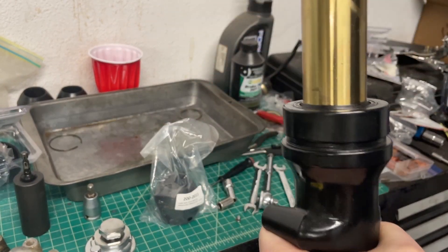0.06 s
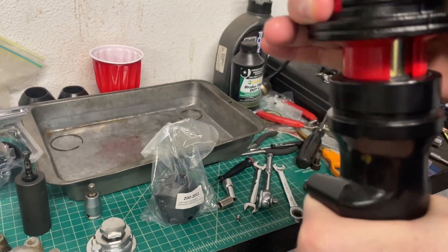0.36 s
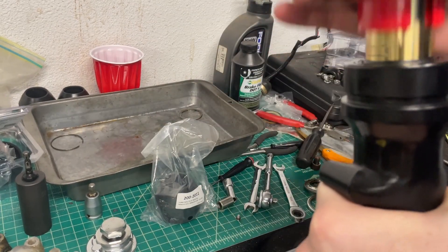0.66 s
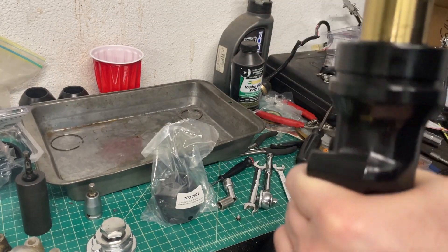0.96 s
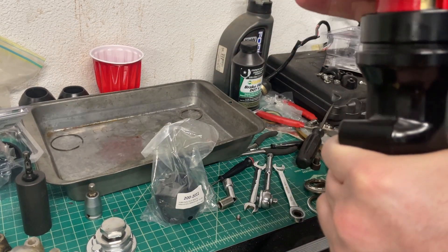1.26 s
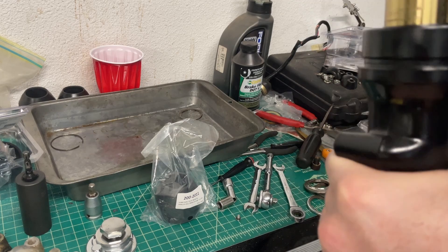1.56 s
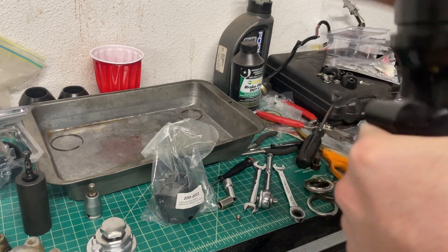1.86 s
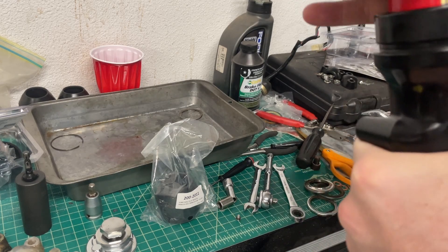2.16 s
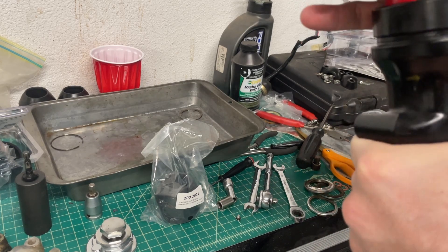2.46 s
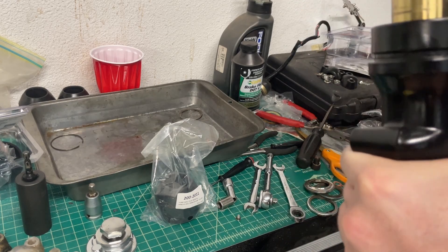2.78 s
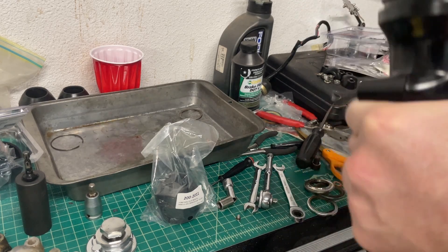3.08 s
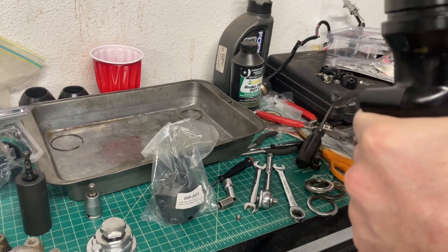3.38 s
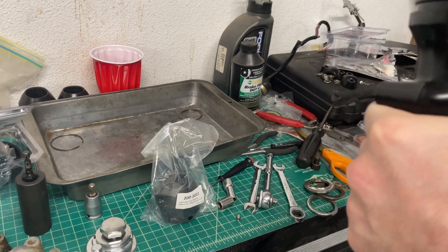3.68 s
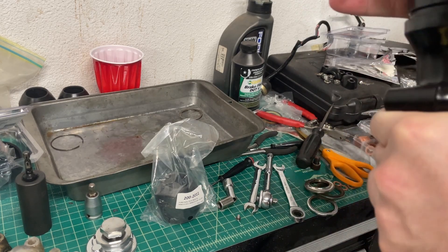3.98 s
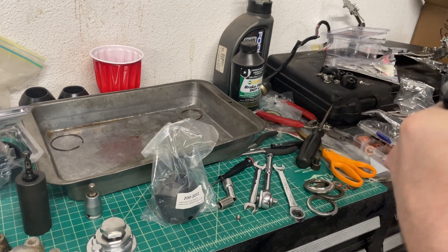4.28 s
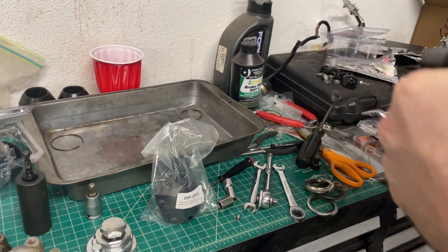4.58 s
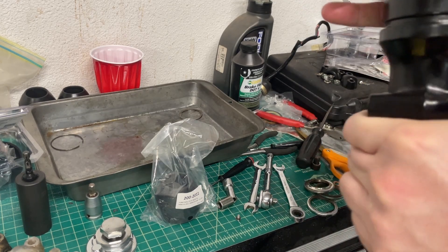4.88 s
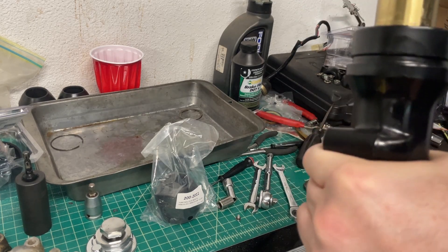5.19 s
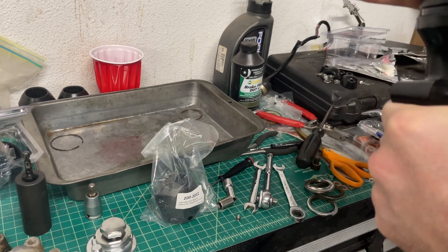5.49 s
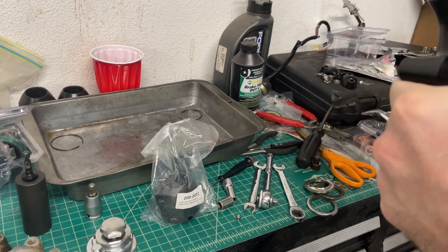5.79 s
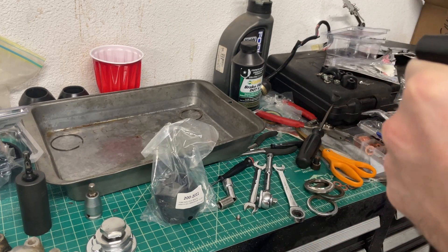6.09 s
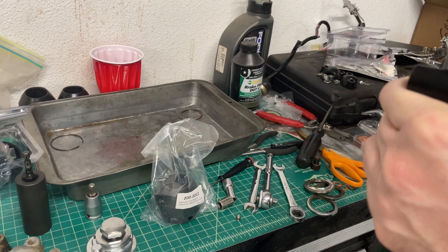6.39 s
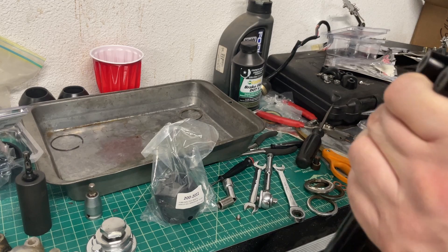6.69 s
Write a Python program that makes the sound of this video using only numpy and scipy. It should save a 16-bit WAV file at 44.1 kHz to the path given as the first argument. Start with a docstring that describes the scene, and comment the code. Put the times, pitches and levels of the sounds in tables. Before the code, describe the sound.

A steel driver is slammed down a hand-held fork tube in a quiet garage, close to the microphone. After a faint rub and a light tap, the first blow lands at 0.3 seconds, a quick scrape running into a loud, sharp metallic clack with a dull thud and a short ring. Two more follow at about 1.1 and 1.8 seconds. After a slightly longer gap, four come evenly at about 3.0, 3.8, 4.6 and 5.4 seconds. Each leaves a brief room echo, and most are followed at once by a smaller click as the driver bounces, clearest after the third. Between blows the driver is lifted with a faint sliding hiss, light ticks, tiny squeaks and an occasional soft knock. After the last blow it slides very faintly, with a couple of tiny ticks just after 6 seconds, fading into low room noise.

```python
"""Driving a fork seal

A steel driver is slammed down a fork tube seven times, close to the microphone in a garage.
Each stroke: it is lifted, hissing and tapping, scrapes down the tube, clacks twice on the seal
and thuds through the hand-held fork leg. A limiter ducks on the blows and lets the room swell back."""
import sys
import numpy as np
from scipy import signal
from scipy.fft import rfft, irfft, next_fast_len
from scipy.io import wavfile
from scipy.ndimage import uniform_filter1d

SR = 44100
rng = np.random.default_rng(int(sys.argv[2]) if len(sys.argv) > 2 else 0)


def persist_wave(psi):
    """Save psi, clipped to +-1, as 16-bit WAV."""
    counts = np.round(np.clip(psi, -1, 1) * 32767).astype(np.int16)
    wavfile.write(sys.argv[1], SR, np.atleast_2d(counts).T)


N = 297498
T = np.arange(SR) / SR  # 1 s time axis
LIFT_S, FALL_S = .33, .122

# Event levels are relative; the functions add layer gains.
# strokes (time [s], first clack [dB], contact gap [s], second clack [dB], treble [dB],
#          scrape [dB], thud [dB], thud pitch [Hz], sway [dB], sliding [dB])
STROKES = [(0.2842, 6, .0062, -2, -7, 17.5, 5, 175.8, -44, -45),
           (1.053, 11.5, 0.0075, 3.5, -2.5, -0.5, 13.5, 202, -28.5, -56),
           (1.8274, 4.5, 0.0046, 11.5, -4, -9.5, 5, 230.4, -44, -60.5),
           (3.0499, 7, .003, 8.5, 1.5, -7.5, 8, 333.8, -32.5, -62),
           (3.783, 5, .0052, 6, 4, -9.5, 9, 191.6, -33.5, -71),
           (4.576, 7, .004, 5, 0.5, -7.5, 6, 318.6, -42, -71),
           (5.3816, -0.5, .0062, 11.5, 5.5, -1.5, 13.5, 264.8, -53, -65.5)]
# driver drops back on the seal (time [s], level [dB])
SEAL_BOUNCES = [(0.3378, -14), (1.8798, -1), (3.0960, -15.5), (3.832, -15), (4.6280, -6.5)]
# loose driver taps the tube (time [s], level [dB], treble [dB])
TUBE_TAPS = [(0.2, -41, -9), (0.2221, -26.5, -3.5), (0.8755, -44, -12), (1.5609, -52, -3.5),
             (1.6793, -45.5, 2), (1.795, -47.5, -3), (2.162, -42.5, 2), (2.7273, -50.5, -4),
             (2.7563, -52, -4.5), (3.583, -59, 1.5), (3.7385, -51.5, 2), (4.2854, -43, -14.5),
             (4.52, -48, -3), (4.5428, -47.5, -5), (5.0337, -44, -15.5), (6.1191, -64, 1.5),
             (6.3194, -65.5, -7)]
# leg knocks in the hand (time [s], level [dB], pitch [Hz])
LEG_KNOCKS = [(0.222, -36, 125.7), (1.248, -36.5, 124.6), (3.221, -48.5, 201), (3.945, -49.5, 129)]
# driver catches on the tube (time [s], level [dB], pitch [Hz], length [s])
TUBE_SQUEAKS = [(0.062, -47, 2096, 0.096), (0.702, -59.5, 2090, 0.11), (0.772, -60, 2040, 0.059),
                (1.596, -51.5, 2070, 0.061), (2.795, -62, 2350, 0.082), (3.604, -59, 2390, 0.047),
                (6.13, -67.5, 2307, .1)]
# driver eased along after the last blow (start [s], length [s], level [dB])
EASE_MOVES = [(5.548, 0.36, -66.5), (6.089, 0.23, -67)]
# hand shifting on the leg (time [s], level [dB])
GRIP_ENVELOPE = [(0, -53), (0.219, -53.5), (0.298, -57.5), (.6, -98)]
# faint hiss and rub between the blows, fading at the end (time [s], level [dB])
BACKGROUND_HISS_ENVELOPE = [(0, -60.5), (.15, -52), (0.599, -70), (2.5, -76), (3.299, -70), (4.2, -74),
                            (5.2, -66), (6.0, -81), (6.75, -99)]
# steel resonances (frequency [Hz], base width [Hz], level [dB])
DRIVER_MODES = [(1830, 40, -3), (2200, 110, 0), (2370, 22, -4), (2700, 50, -1), (2900, 48, -2),
                (3110, 54, -4), (3700, 100, -4), (3880, 73, -1), (4160, 120, -3), (4570, 130, -5),
                (5750, 170, -6), (6160, 53, -5), (6460, 39, -8), (7880, 110, -14), (8130, 60, -14),
                (9850, 110, -9), (10600, 100, -8), (11300, 55, -5), (12100, 75, -5), (12900, 250, -2),
                (13300, 54, -8), (13800, 62, -9)]
TUBE_MODES = [(1150, 53, -17), (1860, 120, -4), (2240, 110, -4), (2640, 58, -5), (2840, 60, -5),
              (3140, 140, -5), (3420, 84, -7), (3770, 95, -1), (4360, 88, -10), (4990, 91, -6),
              (5380, 110, -14), (5730, 110, -8), (6610, 130, 0)]
# noise spectra (frequency [Hz], density [dB])
CRACK_SPECTRUM = [(400, -27.5), (800, -9.5), (1300, -9), (1900, 0.5), (3000, -0.5), (4500, -6.5),
                  (6300, -1.5), (8000, -0.5), (10000, -2.5), (12500, -3.5), (14000, -13.5), (16000, -29)]
SCRAPE_SPECTRUM = [(300, -14.5), (700, -11), (1200, -20), (1800, -1), (2500, -12.5), (4000, -14),
                   (6500, -20.5), (8000, -27), (14000, -35.5)]
RUB_SPECTRUM = [(200, -10), (400, -7), (700, -25.5), (1050, 1.5), (1350, -11.5), (2000, 5.5), (2800, -11.5),
                (3900, 3), (5500, -14), (8000, -12), (14000, -33)]
HISS_SPECTRUM = [(3000, -21.5), (6500, -7.5), (8400, -23.5), (9800, -5), (11000, -10.5), (12400, 2),
                 (14000, -10.5), (16000, -6.5)]
TAP_SPECTRUM = [(300, -20.5), (650, -34), (1080, -7.5), (1400, -22.5), (1950, 5), (2200, -1), (2500, -13.5),
                (3700, -5), (5300, -19.5), (6500, -12.5), (9000, -25.5), (14000, -32)]
GRIP_SPECTRUM = [(25, -18.5), (70, 2.5), (110, 1), (200, -16.5), (400, -24.5), (900, -52.5)]
ECHO_SPECTRUM = [(80, -21.5), (250, -14.5), (500, -14.5), (1000, -17.5), (1450, -15), (1900, -5),
                 (2400, -3.5), (4600, -6.5), (6000, -7.5), (8500, -20.5), (10600, -8), (12600, -10.5),
                 (15000, -29.5)]
RUMBLE_SPECTRUM = [(25, -24), (45, -14.5), (64, -2.5), (90, -11.5), (120, -12), (160, -22), (250, -27.5),
                   (450, -28.5), (650, -39.5), (2000, -41.5), (6000, -41), (15000, -45)]
# garage decay (frequency [Hz], T60 [s])
ECHO_DECAY = [(200, 0.37), (800, 0.51), (2200, 0.55), (4500, 0.47), (7000, 0.49), (12000, 0.28)]
# phase between microphone ports (frequency [Hz], left lead [rad])
MIC_PHASE = [(150, 0.12), (450, 1.04), (1200, 1.4), (2100, 0.9), (2900, 1.39), (4700, 0.62), (5500, 1),
             (7500, 3.5), (9000, 3.5), (11000, 1.19), (13500, 0.5), (16000, 1)]
# balance between microphone ports (frequency [Hz], left minus right [dB])
MIC_BALANCE = [(100, 1.5), (250, -1), (500, 1), (1200, 2), (2400, 0), (8000, 1.5), (15000, -1.5)]


def strokes(scrape_pan_db=-9, thud_lag_s=.00062, echo_db=-19):
    """Scrape, then two contacts as the driver seats; their energy excites the room. Some strokes bounce."""
    near, shocks, scrapes = np.zeros(N), np.zeros(N), np.zeros((2, N))
    pan_db = np.array([[.5], [-.5]]) * scrape_pan_db
    for time_s, first_db, gap_s, second_db, treble_db, scrape_db, thud_db, thud_hz, sway_db, _ in STROKES:
        slide = scrape() * undb(scrape_db - 4 + pan_db)
        first = undb(first_db) * clack(treble_db, ring_db=-.5)
        second = undb(second_db) * clack(treble_db, ring_db=-2.5)
        add(scrapes, time_s - slide.shape[1] / SR, slide)
        add(near, time_s, first)
        add(near, time_s + gap_s, second)
        add(near, time_s + thud_lag_s, undb(thud_db - 7) * thud(thud_hz))
        add(near, time_s + thud_lag_s + .8 * gap_s, undb(thud_db - 1) * thud(thud_hz))
        add(near, time_s, undb(sway_db) * sway())
        strength = np.hypot(np.linalg.norm([first, second]), undb(-7) * np.linalg.norm(slide))
        add(shocks, time_s, strength * shock(treble_db))
    for time_s, level_db in SEAL_BOUNCES:
        add(near, time_s, undb(level_db) * clack(treble_db=-11.5, ring_db=-1.5))
    return mic_ports(near) + scrapes + undb(echo_db) * garage_echo(shocks)


def clack(treble_db, ring_db, crack_t60_s=.028, clatter_db=-28, clatter_t60_s=.16):
    """Steel on steel: a crack of dense modes, the driver's ring, a fine clatter off the bench."""
    envelope = decay(crack_t60_s) + undb(clatter_db) * decay(clatter_t60_s)
    crack = noise(CRACK_SPECTRUM, SR) * envelope
    steel = undb(ring_db) * ring(DRIVER_MODES, damping=.88)
    return shelf(crack + steel, 10000, treble_db)


def ring(modes, damping, scatter_db=7, detune=.003):
    """Decaying modes; each contact lands elsewhere and weights them anew."""
    hz, width_hz, level_db = np.transpose(modes)
    level_draw, pitch_draw, phase = rng.standard_normal((len(hz), 3)).T
    t = T[:SR // 8, None]
    tones = np.sin(2 * np.pi * (hz * (1 + detune * pitch_draw) * t + phase))
    waves = tones * np.exp(-np.pi * width_hz * damping * t)
    weight = undb(level_db + scatter_db * level_draw) * np.sqrt(width_hz)
    return np.pad(waves @ weight / np.linalg.norm(weight), (0, SR - len(t)))


def thud(pitch_hz, lag_cycles=.9):
    """Bending wave in the leg: lows arrive late, so the pitch falls."""
    hz = np.fft.rfftfreq(SR // 2, 1 / SR) + 1
    ratio = hz / pitch_hz
    knock = 1 / np.sqrt(1 + (.7 / ratio) ** 5)
    bass = 1 / (1 + (58 / hz) ** 4)
    rolloff = 1 / np.sqrt(1 + ratio ** 4.2) / (1 + (hz / 1100) ** 4)
    dispersion = np.exp(-2j * np.pi * lag_cycles * np.log(ratio))
    wave = irfft((knock + bass) * rolloff * dispersion)[:SR // 4]
    return wave / abs(wave).max()


def sway(low_hz=45, high_hz=48.1, t60_s=.75):
    """Leg and bench rock against each other: two deep modes beat."""
    return (np.sin(2 * np.pi * low_hz * T) - np.sin(2 * np.pi * high_hz * T)) * decay(t60_s)


def shock(treble_db, ring_db=-12):
    """What a blow sends into the room: an impulse plus a little driver ring."""
    steel = ring(DRIVER_MODES, damping=1.6, scatter_db=5)
    snap = (T == 0) + undb(ring_db) * steel / np.linalg.norm(steel)
    return shelf(snap / np.linalg.norm(snap), 11000, treble_db + 3)


def scrape(rise_s=.0038, grit_db=-9, run_up_db=-42, run_up_s=.02):
    """The accelerating driver sets the tube singing; ends at the blow."""
    size = SR // 4
    singing = tube_song(rng.standard_normal(size), damping=1.1)
    grit = undb(grit_db) * stereo_noise(SCRAPE_SPECTRUM, size, coherence=.11)
    speed = (np.exp(-T / rise_s) + undb(run_up_db) * np.exp(-T / run_up_s))[:size][::-1]
    return (singing + grit) * speed


def tube_song(force, damping):
    """Friction sustains the tube's modes; rms 1."""
    response = ring(TUBE_MODES, damping, scatter_db=4.5)[:SR // 8]
    song = signal.oaconvolve(force, response)[:len(force)]
    return song / song.std()


def sliding(slips_per_s=900, rub_db=-9):
    """Stick-slip on the oily tube: a ringing rub and a fine hiss. Both stay faintly between moves."""
    grip = wander(step_samples=600)
    slips = rng.standard_normal(N) * (rng.random(N) < slips_per_s / SR)
    ringing = undb(-3) * shelf(tube_song(slips, damping=1), 1200, -12)
    rub = undb(.5) * stereo_noise(RUB_SPECTRUM, N, coherence=.6, pan_db=-.5) + ringing
    envelope = hiss_envelope()
    hiss = stereo_noise(HISS_SPECTRUM, N, coherence=.46)
    return envelope * (undb(rub_db + 2.5 * grip) * rub + undb(2 * grip) * hiss)


def hiss_envelope(fall_db=6, uneven_db=1.2, uneven_per_s=20):
    """A faint background plus the driver's uneven speed: an arch per lift, then a ramp to the blow."""
    envelope = gain_curve(BACKGROUND_HISS_ENVELOPE)
    fall = undb(fall_db) * np.linspace(0, 1, int(FALL_S * SR))
    stroke = np.concatenate([arch(LIFT_S), fall])
    for time_s, *_, sliding_db in STROKES:
        add(envelope, time_s - LIFT_S - FALL_S, undb(sliding_db) * stroke)
    for start_s, length_s, level_db in EASE_MOVES:
        add(envelope, start_s, undb(level_db) * arch(length_s))
    return envelope * undb(uneven_db * wander(int(SR / uneven_per_s)))


def squeaks(skirt_hz=450):
    """Brief stick-slip bursts in one narrow resonance."""
    out = np.zeros(N)
    for time_s, level_db, hz, length_s in TUBE_SQUEAKS:
        size = int(length_s * SR)
        band = [(hz - skirt_hz, -35), (hz, 0), (hz + skirt_hz, -35)]
        add(out, time_s, undb(level_db) * np.hanning(size) * noise(band, size))
    return mic_ports(out)


def handling(tap_t60_s=.04, ring_db=-10, echo_db=-14):
    """The loose driver taps the tube; the leg rubs and knocks in the hand."""
    out = gain_curve(GRIP_ENVELOPE) * noise(GRIP_SPECTRUM, N)
    for time_s, level_db, treble_db in TUBE_TAPS + rattle():
        tap = noise(TAP_SPECTRUM, SR) * decay(tap_t60_s) + undb(ring_db) * ring(TUBE_MODES, damping=1)
        add(out, time_s, undb(level_db + 3) * shelf(tap, 6400, treble_db))
    for time_s, level_db, pitch_hz in LEG_KNOCKS:
        add(out, time_s, undb(level_db) * thud(pitch_hz))
    return mic_ports(out) + undb(echo_db) * garage_echo(out)


def rattle(taps_per_lift=2, spread_db=.5, treble_db=-3):
    """Faint random taps during each lift, as rows like TUBE_TAPS."""
    taps = []
    for time_s, *_, sliding_db in STROKES:
        for fraction, draw in zip(rng.random(taps_per_lift), rng.standard_normal(taps_per_lift)):
            tap_s = time_s - FALL_S - fraction * LIFT_S
            taps.append((tap_s, sliding_db - 4.5 + spread_db * draw, treble_db))
    return taps


def garage_echo(x, build_s=.0049):
    """Diffuse room echo; the top treble dies first."""
    diffuse = stereo_noise(ECHO_SPECTRUM, SR, coherence=.25, pan_db=-1)
    hz, t, cells = signal.stft(diffuse, SR, nperseg=256)
    cells = cells * np.exp(-np.log(1000) * t / log_interp(ECHO_DECAY, hz)[:, None])
    response = signal.istft(cells, SR)[1][:, :SR] * (1 - np.exp(-T / build_s))
    return signal.fftconvolve(x[None], response / np.linalg.norm(response[0]), axes=1)[:, :N]


def garage_rumble(level_db=-70):
    """Faint steady room noise, alike in both channels."""
    return undb(level_db) * stereo_noise(RUMBLE_SPECTRUM, N, coherence=1)


def mic_ports(x):
    """A near source reaches the two ports with different phase and level."""
    n = next_fast_len(N, True)
    hz = np.fft.rfftfreq(n, 1 / SR)
    left = undb(log_interp(MIC_BALANCE, hz) / 2) * np.exp(.5j * log_interp(MIC_PHASE, hz))
    return irfft(rfft(x, n) * np.array([left, 1 / left]), n)[:, :N]


def noise(spectrum, size):
    """Coloured noise; rms 1."""
    n = next_fast_len(size, True)
    gain = undb(log_interp(spectrum, np.fft.rfftfreq(n, 1 / SR)))
    x = irfft(rfft(rng.standard_normal(n)) * gain, n)[:size]
    return x / x.std()


def stereo_noise(spectrum, size, coherence, pan_db=0):
    """Left and right noise sharing part of their power."""
    own = np.array([noise(spectrum, size), noise(spectrum, size)])
    mix = np.sqrt(coherence) * noise(spectrum, size) + np.sqrt(1 - coherence) * own
    return mix * undb([[pan_db / 2], [-pan_db / 2]])


def wander(step_samples):
    """Random values joined by ramps."""
    steps = np.repeat(rng.standard_normal(N // step_samples + 1), step_samples)
    return uniform_filter1d(steps, step_samples)[:N]


def arch(length_s):
    """Speed of a move from rest to rest; peak 1."""
    return np.sin(np.linspace(0, np.pi, int(length_s * SR))).clip(0)


def decay(t60_s):
    """Exponential decay."""
    return np.exp(-np.log(1000) * T / t60_s)


def gain_curve(points):
    """Gain per sample from (time [s], level [dB])."""
    return undb(np.interp(np.arange(N) / SR, *np.transpose(points)))


def log_interp(points, hz):
    """Interpolate on a log-frequency axis."""
    points_hz, values = np.transpose(points)
    return np.interp(np.log(hz + 1), np.log(points_hz), values)


def shelf(x, corner_hz, gain_db):
    """First-order high shelf."""
    low = signal.sosfilt(signal.butter(1, corner_hz, fs=SR, output="sos"), x)
    return low + undb(gain_db) * (x - low)


def undb(db):
    """Decibels to gain."""
    return 10 ** (np.asarray(db) / 20)


def add(out, start_s, x):
    """Mix x in at start_s, cut to the scene."""
    start = int(start_s * SR)
    a, b = max(start, 0), min(start + x.shape[-1], N)
    out[..., a:b] += x[..., a - start:b - start]


def scene():
    """Strokes, friction and handling over the room's rumble."""
    return strokes() + sliding() + squeaks() + handling() + garage_rumble()


def record(dry, threshold_db=-7, release_db_per_s=85, window_s=.0045, cutoff_hz=15800):
    """A limiter ducks just ahead of each blow and recovers steadily; peaks clip, the top is cut."""
    window = int(window_s * SR)
    power = np.maximum(uniform_filter1d(np.mean(dry ** 2, axis=0), window), 1e-12)
    over_db = np.maximum(10 * np.log10(power) - threshold_db, 0)
    recovery_db = release_db_per_s * np.arange(N) / SR
    held_db = np.maximum.accumulate(over_db + recovery_db) - recovery_db
    duck_db = uniform_filter1d(held_db, window)
    low_pass = signal.ellip(8, .2, 70, cutoff_hz, fs=SR, output="sos")
    return signal.sosfilt(low_pass, np.clip(dry * undb(-duck_db), -1, 1))


dry = scene()
out = record(dry)
persist_wave(out)
```